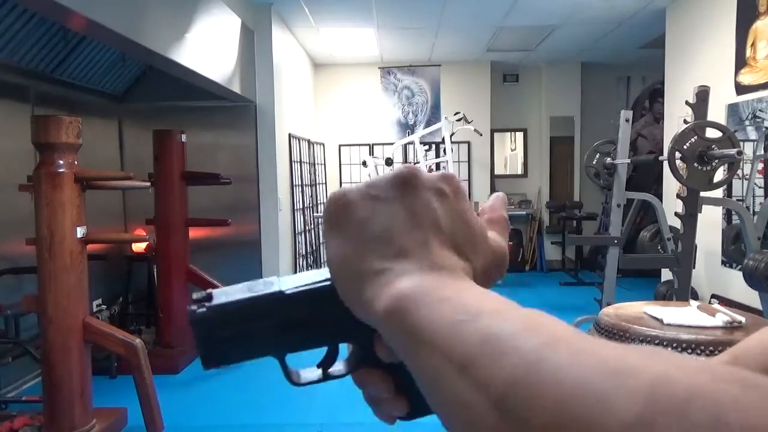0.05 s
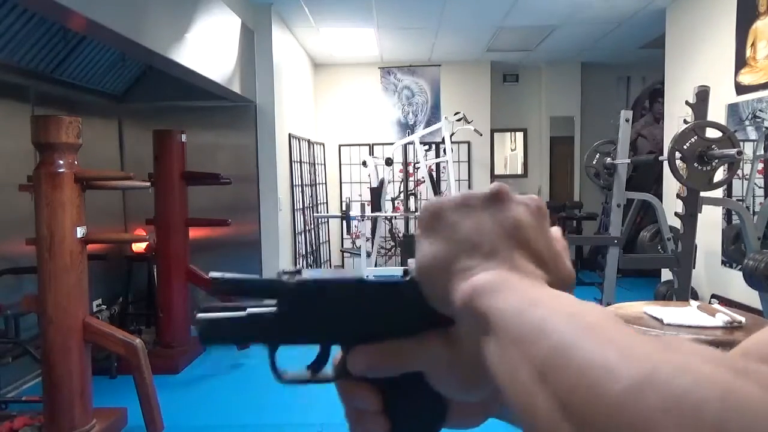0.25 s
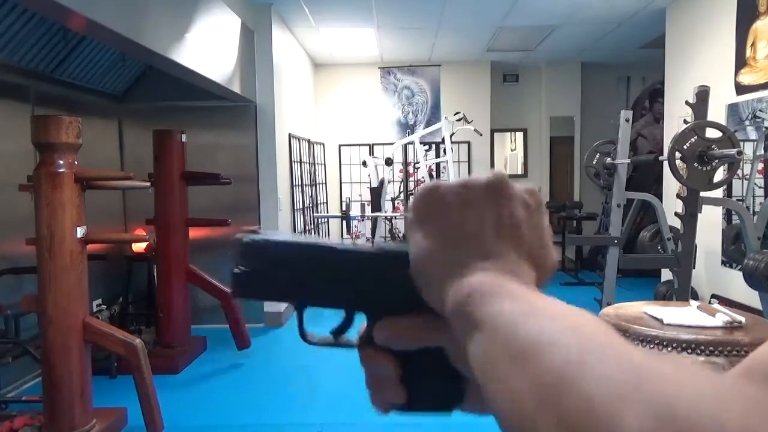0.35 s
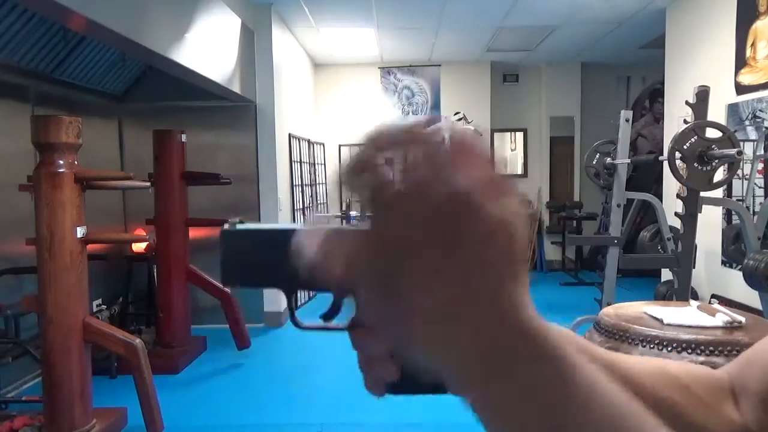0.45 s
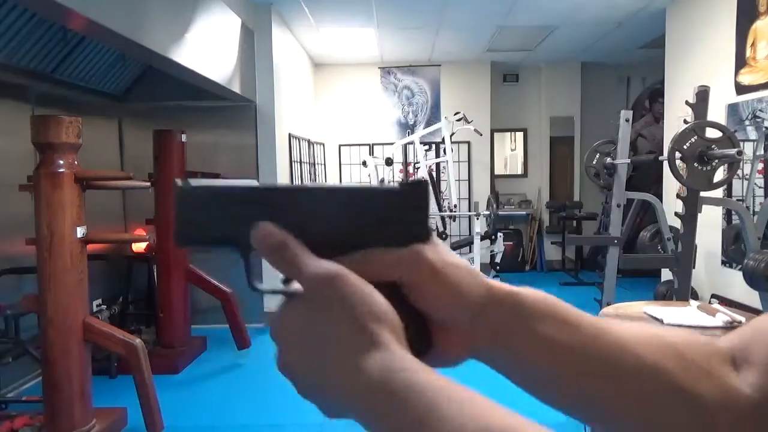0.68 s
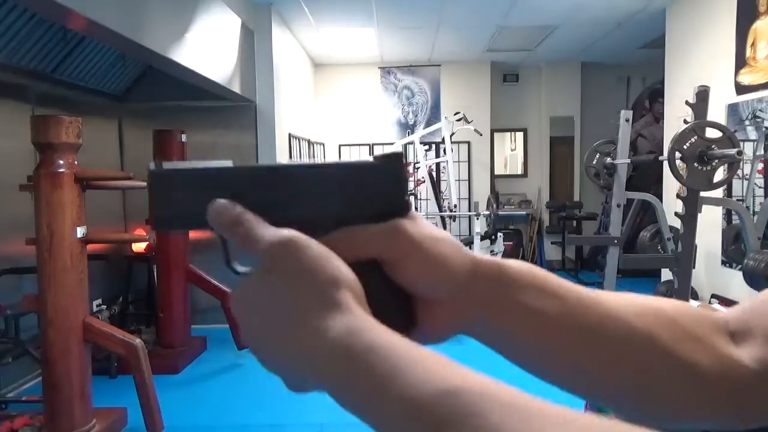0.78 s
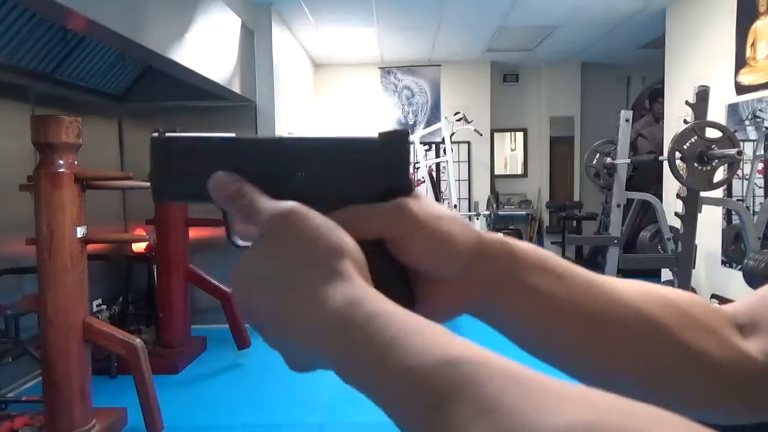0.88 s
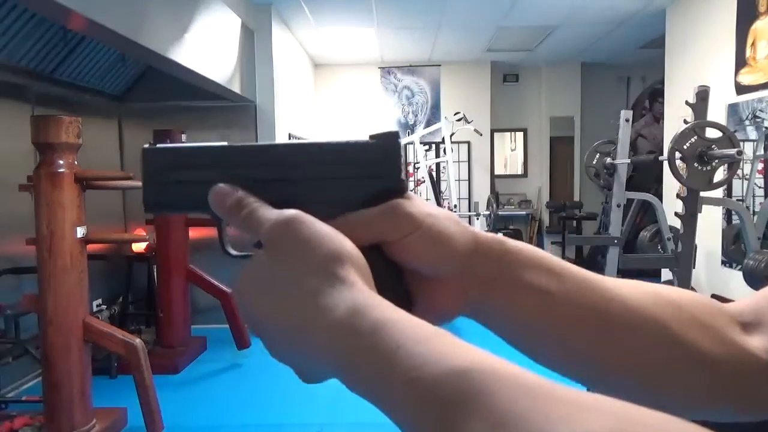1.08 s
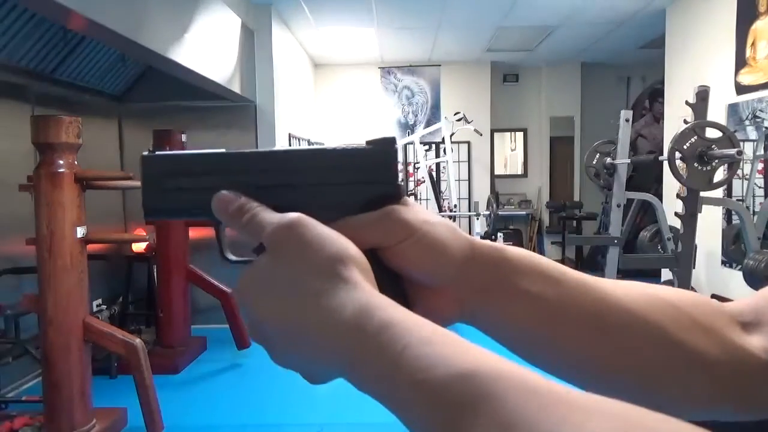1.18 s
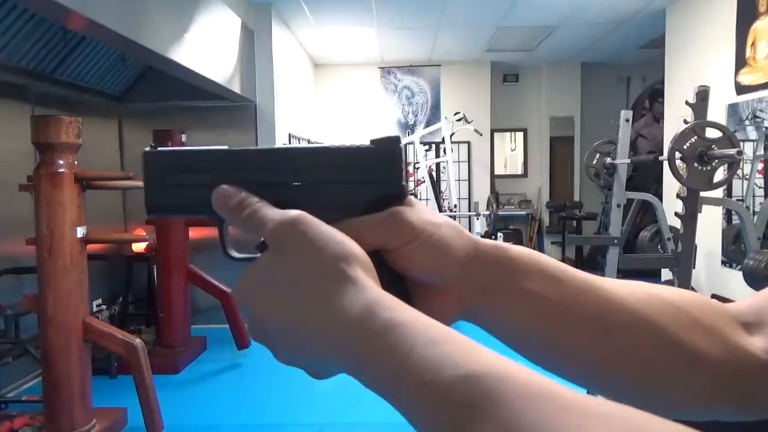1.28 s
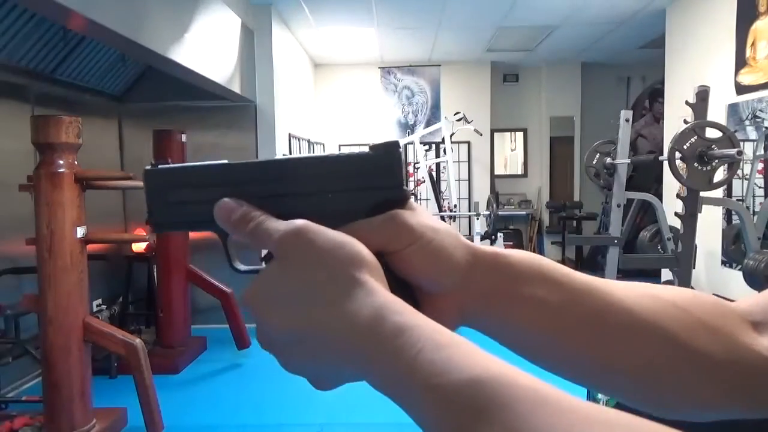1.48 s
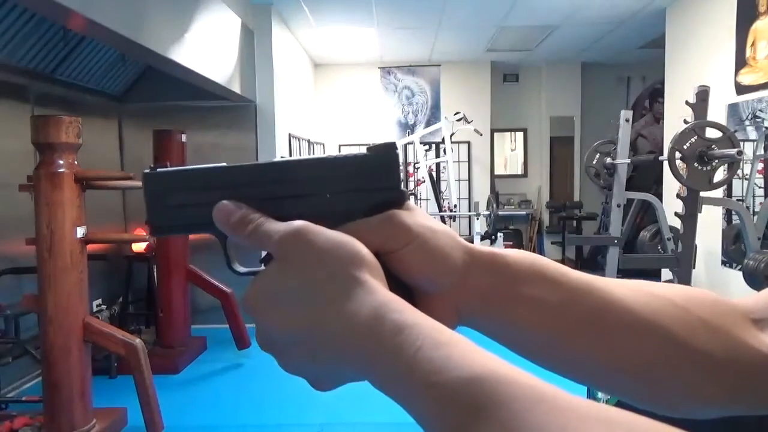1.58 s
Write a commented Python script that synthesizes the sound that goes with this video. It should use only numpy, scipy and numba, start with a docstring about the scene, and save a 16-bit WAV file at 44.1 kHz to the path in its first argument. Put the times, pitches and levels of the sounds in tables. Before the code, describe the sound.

Over quiet ventilation hum in a hard indoor gym, a handgun slide is pulled back with a rattle and squeak, then slams forward, very close and loud; afterwards only room tail and tiny handling sounds.

```python
"""Gym ventilation hums throughout: shaped noise and wavering sines; a faint whine flutters. Skin brushes the frame (noise).
A pistol slide close to the microphone unlocks, rattles back, squeaks and hits its rear stop, then runs forward and
slams shut: noise cracks over decaying steel modes, pitched knocks, scraping noise, wobbling sines, a reverberant room.
A fast limiter flattens the loud clacks, so the room swells up after the rear stop and after the slide shuts.
Afterwards the hands settle on the grip: a brush and small noise ticks."""
import sys
import numpy as np
from scipy import signal
from scipy.fft import rfft, irfft
from scipy.io import wavfile
from scipy.ndimage import uniform_filter1d
from numba import njit

SR = 44100
rng = np.random.default_rng(int(sys.argv[2]) if len(sys.argv) > 2 else 0)


def to_wav(s):
    """Save 16-bit WAV."""
    ch = np.atleast_2d(s).T  # columns
    pcm = np.round(np.clip(ch, -1, 1) * 32767)  # PCM
    wavfile.write(sys.argv[1], SR, pcm.astype(np.int16))


N = 72765

# ventilation noise, relative density: f/Hz, level/dB
AIR_SPECTRUM = [(25, -24), (65, -12.5), (95, -15.5), (180, -6), (280, -4.5), (420, -5.5), (650, -6.5),
                (1200, -11), (3200, -16.5), (6500, -19), (11000, -21)]
# side filter of that noise: f/Hz, gain/dB
AIR_SIDE_GAIN = [(60, -14), (250, -12.5), (1000, 0), (10000, -7.5)]
# hum lines, before wavering: f/Hz, level/dB
HUM_LINES = [(65, -88), (240, -73.5), (339, -74.5), (420, -68), (479, -73.5), (601, -78)]
AIR_DB = -58
WHINE_HZ, WHINE_WAVER_RAD, WHINE_GAIN_DB, FLUTTER_HZ = 3250, 1.1, -69.5, 29.7

# room decay: f/Hz, T60/s
ROOM_DECAY = [(150, 0.81), (700, 0.46), (2000, 0.509), (4000, 0.4868), (7000, 0.367), (11000, 0.2973)]
# room colour: f/Hz, gain/dB
ROOM_TONE = [(100, -17.5), (600, 2.5), (1500, -2.5), (3000, 0.5), (5000, -4.5), (6500, -1.5), (10500, -1)]
# room width: f/Hz, side gain/dB
ROOM_SIDE_GAIN = [(200, -12.5), (1000, -7.5), (4000, -7.5), (8000, -7), (11000, -15.5)]
ROOM_GAIN_DB, EARLY_GAIN_DB, DIRECT_SIDE_DB = -3, -3.5, -15.5
ROOM_GAP_S, ROOM_BUILD_S = 0.00725, .008

# skin brushing the frame: t/s, length/s, level/dB
SKIN_BRUSHES = [(0.067, .055, -65.5), (0.822, 0.031, -57.5)]
# low knocks of the frame in the hand: t/s, level/dB
PALM_THUMPS = [(.264, -44.5), (0.298, -39.5), (.436, -36.5)]
# small ticks of the grip: t/s, level/dB, f/Hz
GRIP_TICKS = [(.7915, -64, 4350), (.8028, -48, 4900), (.98, -59, 2520), (1.046, -49, 1870),
              (1.271, -54.5, 1900)]
BRUSH_HZ, THUMP_HZ = 9800, 150
THUMP_DECAY_S, TICK_DECAY_S = .006, 0.0025

# scrape of the rails: t/s, length/s, level/dB
RAIL_SCRAPES = [(0.268, .044, -26.5), (.414, .024, -30)]
# squeaks of the sliding steel: t/s, length/s, f/Hz, level/dB
RAIL_SQUEAKS = [(0.256, .021, 9510, -12), (0.276, .008, 9240, -6.5), (0.279, .006, 9230, -16.5)]

# frame and barrel as the slide unlocks and starts forward: t/s, level/dB, f/Hz, decay/s
PART_KNOCKS = [(0.2235, -27.5, 1529, 0.003), (0.2357, -9, 4937, .0015), (0.3886, -5.5, 1645, 0.0021),
               (0.3979, 7, 4894, .0024), (0.4005, -0.5, 4990, 0.0011), (0.4051, 5, 4906, .002)]
KNOCK_CLICK_DB = -7.5
KNOCK_ROOM_DB = -8  # these face the microphone and send less into the room

# slide contacts: t/s, level/dB, length/ms, body below 2 kHz/dB, brightness above 7 kHz/dB
SLIDE_CLACKS = [(0.2281, -20, 2, 5.5, 0.5), (0.2318, -26, 0.88, 11, 5), (0.236, 1, 1.2, -3, 3),
                (0.2444, 1, 2, -4.5, -16), (0.2469, -9, 1.5, 2.5, 4.5), (0.2517, -8.5, 1.5, -11, 14.5),
                (0.2664, -5, 2, -7.5, 3.5), (0.2759, 1.5, 0.8, -9.5, 0.5), (0.2909, -1.5, 2, -10, 7.5),
                (0.2977, 11.5, 1.9, 0.5, 2), (0.303, 4, 1.2, 2.5, 3.5), (0.3288, 2, 1, -12.5, -16),
                (0.3355, -5.5, 2, -4, -2), (0.3878, 0, 1.5, 4, 2.5), (0.3974, 8.5, 2.8, -3.5, -8),
                (0.4013, -2, 1.5, -7, -0.5), (0.4043, 5.5, 0.98, -7.5, 1), (0.415, -7, 2, -10, 21.5),
                (0.4158, -10, 2.2, 7.5, 10), (0.4229, 0, 2, -5.5, 10.5), (0.4345, -12.5, 1, 20, 3.5),
                (0.437, -2.5, 2.4, 8, 12), (0.4423, 1.5, 5.3, 3, 5.5), (0.4453, 3, 1.3, -5, -4.5)]
# steel modes: f/Hz, T60/s, level drawn back/dB, level shutting/dB (relative)
STEEL_MODES = [(890, .04, -2, -26.5), (1677, .03, 2.5, 3), (2379, 0.11, -2, -2.5), (3080, .07, -7, -9.5),
               (3290, .14, -16, -1.5), (4177, .12, -1, -12.5), (4370, .09, -0.5, -6), (4670, .09, -4, -8),
               (5010, 0.25, -6.5, -17), (6870, .08, -10.5, 3.5), (8650, .08, -10, -11),
               (9550, .12, 0.5, 13.5), (9980, .12, -9.5, -1.5), (10480, .1, -9.5, 2)]
# steel striking steel: f/Hz, gain/dB
CRACK_SPECTRUM = [(60, -38), (250, -29.5), (450, -21), (750, -10), (1900, -5.5), (2700, -0.5), (4700, 5),
                  (6200, -6.5), (7500, -2), (10800, 1), (13000, -30)]
SHUTS_S, RING_GAIN_DB = .41, -27
CONTACT_S, FALL_S = .0003, .0006
STEEL_CUT_HZ = 260

LIMIT_DB, ATTACK_S, RELEASE_S, LOOKAHEAD_S = -12.5, .0002, 0.01, 0.00016
SLOW_ATTACK_S, SLOW_RELEASE_S, SLOW_SHARE = .02, 0.86, 0.27
TOP_HZ = 11000


def undb(db):
    """Decibels to gain."""
    return 10 ** (np.asarray(db) / 20)


def unit(x):
    """Scale to rms 1."""
    return x / np.sqrt(np.mean(x ** 2))


def at(table, hz):
    """Read (f/Hz, value) points on a log-frequency axis."""
    points = np.array(table)
    return np.interp(np.log(hz + 1e-9), np.log(points[:, 0]), points[:, 1])


def colour(x, table):
    """Minimum-phase filter through (f/Hz, gain/dB) points, by folding the cepstrum."""
    size = 2048
    gain = undb(at(table, np.fft.rfftfreq(size, 1 / SR)))
    cepstrum = irfft(np.log(gain))
    cepstrum[1:size // 2] *= 2
    cepstrum[size // 2 + 1:] = 0
    response = irfft(np.exp(rfft(cepstrum)))
    return signal.fftconvolve(x, response)[:len(x)]


def band(hz, width_hz):
    """Gaussian-band noise at rms 1, 17 dB down at +-width_hz."""
    f = np.fft.rfftfreq(N, 1 / SR)
    bell = np.exp(-2 * ((f - hz) / width_hz) ** 2)
    return unit(irfft(rfft(rng.standard_normal(N)) * bell, N))


def strike(start_s, decay_s):
    """Envelope of a blow: quick rise, exponential fall."""
    age = np.maximum(np.arange(N) / SR - start_s, 0)
    return (1 - np.exp(-age / CONTACT_S)) * np.exp(-np.minimum(age / decay_s, 60))


def stroke(start_s, length_s):
    """Half-ellipse envelope of a rubbing movement."""
    u = np.clip((np.arange(N) / SR - start_s) / length_s, 0, 1)
    return np.sqrt(u * (1 - u)) * 2


def stereo(mid, side):
    """Left and right from mid and side."""
    return np.array([mid + side, mid - side])


def background():
    """Ventilation noise, hum lines wavering in level and phase; apart from them, a faint fluttering whine."""
    t = np.arange(N) / SR
    mid, side = (undb(AIR_DB) * unit(colour(rng.standard_normal(N), AIR_SPECTRUM)) for _ in range(2))
    hum = np.zeros(N)
    for hz, db in HUM_LINES:
        level = np.sqrt(2) * undb(db) * (1 + .3 * band(0, 6))
        hum += level * np.sin(2 * np.pi * hz * t + .5 * band(0, 2.1))
    flutter = (1 + np.sin(2 * np.pi * FLUTTER_HZ * t)) ** 2 / 2
    whine = np.sin(2 * np.pi * WHINE_HZ * t + WHINE_WAVER_RAD * band(0, 130))
    return stereo(mid + hum + undb(WHINE_GAIN_DB) * flutter * whine, colour(side, AIR_SIDE_GAIN))


def room_response():
    """Weak early reflections, then a diffuse tail whose treble dies first."""
    t, f = np.arange(N) / SR, np.fft.rfftfreq(N, 1 / SR)
    noise = rfft(rng.standard_normal(N))
    centres_hz = [hz for hz, _ in ROOM_DECAY]
    tail = np.zeros(N)
    for share, (_, t60_s) in zip(np.eye(len(centres_hz)), ROOM_DECAY):
        # overlapping triangular bands that sum to 1
        part = irfft(noise * np.interp(f, centres_hz, share), N)
        tail += part * np.exp(-np.log(1000) * t / t60_s)
    build = np.clip((t - ROOM_GAP_S) / ROOM_BUILD_S, 0, 1)
    early = undb(EARLY_GAIN_DB) * np.minimum(t / ROOM_GAP_S, 1)
    tail = tail * (build + (1 - build) * early)
    return colour(unit(tail) / np.sqrt(N), ROOM_TONE)


def hands():
    """The frame knocks in the palm; fingers tick and brush on the grip: enveloped band noise."""
    thumps = band(THUMP_HZ, 240) * sum(undb(db) * strike(s, THUMP_DECAY_S) for s, db in PALM_THUMPS)
    ticks = sum(undb(db) * strike(s, TICK_DECAY_S) * band(hz, 1466) for s, db, hz in GRIP_TICKS)
    brushes = band(BRUSH_HZ, 2200) * sum(undb(db) * stroke(s, length_s) ** 2 for s, length_s, db in SKIN_BRUSHES)
    return thumps + ticks + brushes


def rails():
    """The slide grinds along its rails (rough noise) and catches in a thin squeak (unsteady sine)."""
    t = np.arange(N) / SR
    rough = rng.standard_normal(N) * np.exp(.5 * band(0, 900))
    grit = unit(colour(rough, CRACK_SPECTRUM))
    out = grit * sum(undb(db) * stroke(s, length_s) for s, length_s, db in RAIL_SCRAPES)
    for s, length_s, hz, db in RAIL_SQUEAKS:
        squeak = np.sin(2 * np.pi * hz * t + .3 * band(0, 300))
        out += np.sqrt(2) * undb(db) * stroke(s, length_s) * squeak
    return out


def knocks():
    """A small click and the quickly damped ring of the part that is struck."""
    t = np.arange(N) / SR
    click = undb(KNOCK_CLICK_DB) * band(2000, 4400)
    out = np.zeros(N)
    for s, db, hz, decay_s in PART_KNOCKS:
        ring = np.sqrt(2) * np.sin(2 * np.pi * hz * t) * strike(s, decay_s)
        out += undb(db) * (ring + click * strike(s, decay_s / 3))
    return out


def crack(t, length_s):
    """Steel chatters against steel for up to a few milliseconds, then stops short."""
    shape = (1 - np.exp(-t / CONTACT_S)) * np.exp(-np.maximum(t - length_s, 0) / FALL_S)
    return rng.standard_normal(len(t)) * shape


def clacks():
    """Each contact is a short crack that sets the steel ringing; the ring changes as the slide shuts."""
    out, size = np.zeros(N), 8192
    t = np.arange(size) / SR
    hz, t60_s, back_db, shut_db = np.array(STEEL_MODES).T[:, :, None]
    for start_s, db, length_ms, body_db, bright_db in SLIDE_CLACKS:
        burst = crack(t, length_ms / 1000)
        tone = [(1600, body_db), (2400, 0.0079), (5500, 0.0091), (8500, bright_db)]
        mode_db = back_db if start_s < SHUTS_S else shut_db
        modes = undb(mode_db) * np.exp(-np.log(1000) * t / t60_s)
        ring = np.sum(modes * np.sin(2 * np.pi * (hz * t + rng.random(hz.shape))), axis=0)
        hit = colour(colour(burst, CRACK_SPECTRUM), tone) + undb(RING_GAIN_DB) * ring
        i = int(start_s * SR)
        out[i:i + size] += undb(db) * hit
    return out


def scene():
    """The pistol straight ahead, the room all round; the small steel parts radiate no bass."""
    cut = signal.butter(3, STEEL_CUT_HZ, "high", fs=SR, output="sos")
    slide = signal.sosfilt(cut, clacks() + rails()) + hands()
    knocked = signal.sosfilt(cut, knocks())
    gun = slide + knocked
    to_room = slide + undb(KNOCK_ROOM_DB) * knocked
    mid, side = (undb(ROOM_GAIN_DB) * signal.fftconvolve(to_room, room_response())[:N] for _ in range(2))
    # a short random filter gives the direct sound some width
    size = 64
    scatter = signal.lfilter(unit(rng.standard_normal(size)) / np.sqrt(size), 1, gun)
    sides = undb(DIRECT_SIDE_DB) * scatter + colour(side, ROOM_SIDE_GAIN)
    return stereo(gun + mid, sides) + background()


@njit
def follow(x, attack_s, release_s):
    """Level follower with separate rise and fall times."""
    out, e = np.empty(len(x)), 0.
    up, down = 1 - np.exp(-1 / (attack_s * SR)), 1 - np.exp(-1 / (release_s * SR))
    for i in range(len(x)):
        e += (x[i] - e) * (up if x[i] > e else down)
        out[i] = e
    return out


def record(dry):
    """A fast limiter that looks ahead, a little of whose gain reduction lingers; then the top is cut."""
    t = np.arange(N) / SR
    level = follow(np.abs(dry).max(axis=0), ATTACK_S, RELEASE_S)
    over = np.maximum(level / undb(LIMIT_DB), 1)
    over = np.interp(t + LOOKAHEAD_S, t, uniform_filter1d(over, size=24))
    lingering = follow(np.log(over), SLOW_ATTACK_S, SLOW_RELEASE_S) * SLOW_SHARE
    wet = dry / np.maximum(over, np.exp(lingering))
    return signal.sosfilt(signal.ellip(10, .1, 70, TOP_HZ, fs=SR, output="sos"), wet)


dry = scene()
out = record(dry)
to_wav(out)
```